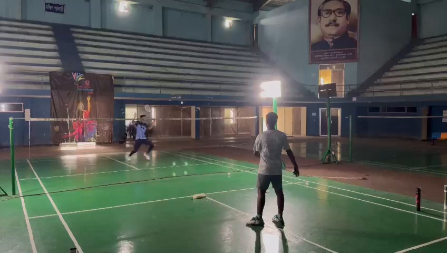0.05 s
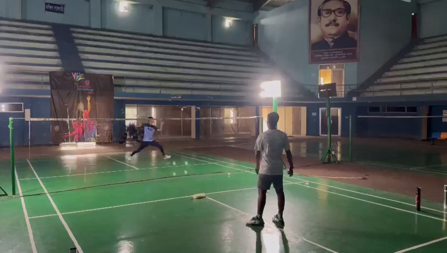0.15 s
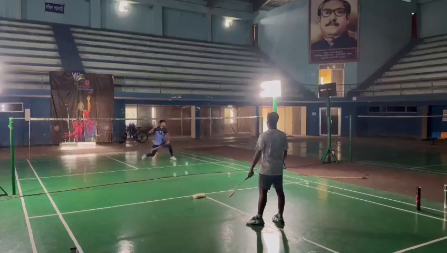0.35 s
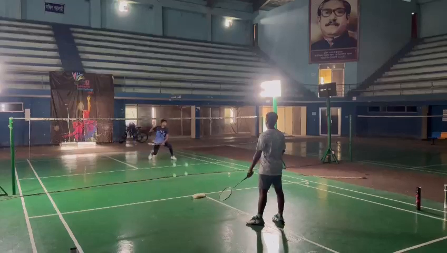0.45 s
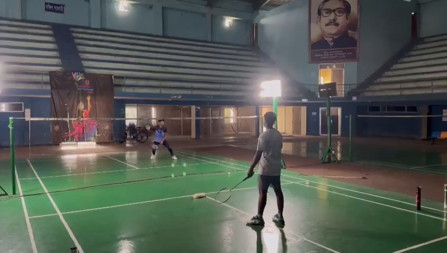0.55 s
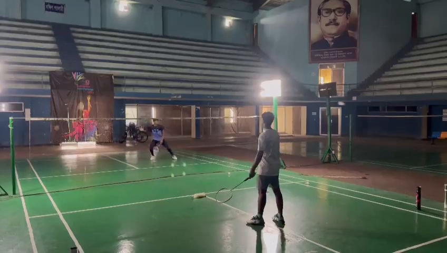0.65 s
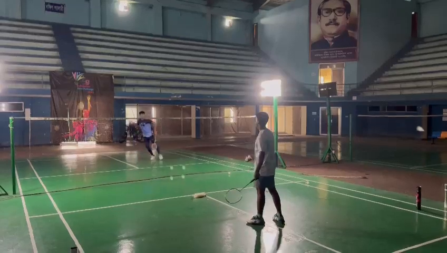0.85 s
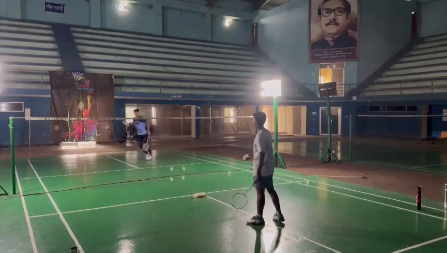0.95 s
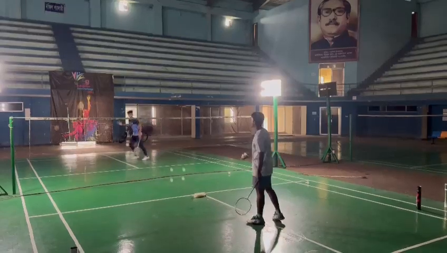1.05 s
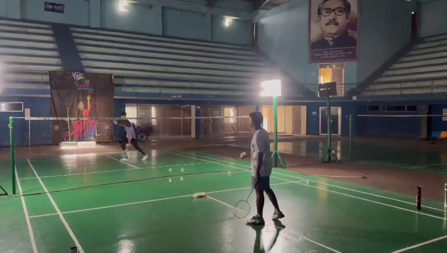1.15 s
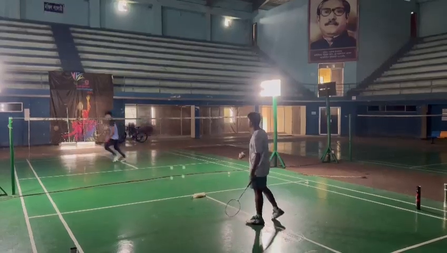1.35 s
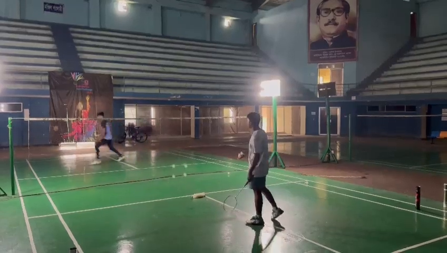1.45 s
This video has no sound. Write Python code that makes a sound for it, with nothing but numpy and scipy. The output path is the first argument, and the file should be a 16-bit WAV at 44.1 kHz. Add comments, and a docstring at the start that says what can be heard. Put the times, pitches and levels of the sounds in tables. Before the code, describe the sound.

In a large hard sports hall, faint high squeaks and a quick step lead to one loud, stringy racket pop, slightly left; its echo lingers over low rumble, and soft footfalls and a scuff come last.

```python
"""A large, hard sports hall: a racket strikes a shuttlecock as shoes squeak, thud and scuff on the court.
The blow is a gliding string tone, a sagging thump, frame modes and a noise crackle; squeaks are gliding
tones, footfalls damped knocks with slaps of noise, scuffs short high-passed noise.
A near surface answers within two hundredths of a second, then the long tail of the hall, noise
decaying band by band, swells in over a steady rumble of coloured noise."""
import sys
import numpy as np
from scipy import signal
from scipy.fft import rfft, irfft
from scipy.io import wavfile

SR = 44100
rng = np.random.default_rng(int(sys.argv[2]) if len(sys.argv) > 2 else 0)


def level_to_linear(level):
    """Convert decibel levels to linear amplitude factors, elementwise."""
    exponent = np.asarray(level, float) / 20
    return 10 ** exponent


def bounce(signal):
    """Save signal as a 16-bit WAV file at the path given by the first command-line argument."""
    frames = np.transpose(np.atleast_2d(signal))
    limited = np.clip(frames, -1, 1)
    pcm = np.round(limited * 32767).astype(np.int16)
    wavfile.write(sys.argv[1], SR, pcm)


N = 66150


def at_hz(rows, hz, column=1):
    """A table column read on a log-frequency axis."""
    rows = np.array(rows, float)
    return np.interp(np.log(hz + 1), np.log(rows[:, 0]), rows[:, column])


def since(s):
    """Seconds after s, zero before."""
    return np.maximum(np.arange(N) / SR - s, 0)


def pan(x, db):
    """Two channels, the left db above the right."""
    return x * level_to_linear(np.array([[db / 2], [-db / 2]]))


def ring(t, hz, t60):
    """A mode swings up with a time constant of one cycle and dies away exponentially."""
    rise = 1 - np.exp(-t * hz)
    return np.sin(2 * np.pi * hz * t) * rise * level_to_linear(-60 * t / t60)


def passed(x, hz, kind):
    """Second-order high- or low-pass."""
    return signal.sosfilt(signal.butter(2, hz, kind, fs=SR, output="sos"), x)


# Blows of the racket, a little left of the microphones.
# Each row: start in seconds, level in dB, left over right in dB.
BLOWS = [(0.3558, -10.5, 2.5)]
# Modes of frame and cork under each blow. Each row: pitch in Hz, relative level in dB, t60 in seconds.
FRAME_MODES = [(528, -14, 0.056), (1940, -1.5, 0.0048), (2720, -12.5, 0.0086)]


def racket():
    """The cork rings string bed and frame and pushes air; a bright crackle rides on the contact."""
    out = 0
    for start_s, db, pan_db in BLOWS:
        t = since(start_s)
        frame = sum(level_to_linear(mode_db) * ring(t, hz, t60) for hz, mode_db, t60 in FRAME_MODES)
        body = strings(t) + thump(t) + frame
        out = out + level_to_linear(db) * pan(body + crackle(t), pan_db)
    return out


STRINGS_HZ, LOADED_HZ = 1034, 790
CONTACT_S, LEAVE_S = 0.0028, 0.0022  # full contact, then the time to glide free
STRINGS_DB, DRIVEN_DB, STRINGS_T60_S = -6.5, 5, 0.072


def strings(t):
    """The cork's mass pulls the pitch down and drives it hard; as it leaves, the tone glides up and rings free."""
    loaded = 1 - np.clip((t - CONTACT_S) / LEAVE_S, 0, 1)
    hz = STRINGS_HZ + (LOADED_HZ - STRINGS_HZ) * loaded
    phase = 2 * np.pi * np.cumsum(hz * (t > 0)) / SR
    level = level_to_linear(STRINGS_DB + DRIVEN_DB * loaded - 60 * t / STRINGS_T60_S)
    return np.sin(phase) * np.minimum(t / 0.00078, 1) * level


# Low thump of the blow.
# Its row: start pitch in Hz, end pitch in Hz, sag time constant in seconds, relative level in dB, t60 in seconds.
THUMP = (400, 165, .009, -8, .075)


def thump(t):
    """A low push of air whose pitch sags as it dies."""
    start_hz, end_hz, sag_s, db, t60 = THUMP
    hz = end_hz + (start_hz - end_hz) * np.exp(-t / sag_s)
    phase = 2 * np.pi * np.cumsum(hz * (t > 0)) / SR
    return np.sin(phase) * (1 - np.exp(-t / 0.003)) * level_to_linear(db - 60 * t / t60)


# Colour of the contact crackle. Each row: frequency in Hz, relative level in dB per Hz.
CRACK_COLOUR = [(1500, 5), (3400, -9), (4300, -1.5), (5600, -6), (6500, -19.5), (8400, -1.5), (10400, -8),
                (12000, -13)]
CRACK_DB = -13
CRACK_SIDE_DB = 1  # difference between the microphones, against what they share
CRACK_RISE_S, CRACK_HOLD_S, CRACK_T60_S = 0.001, 0.0027, 0.011


def crackle(t):
    """A short burst of bright noise, partly different in each microphone."""
    hz = np.arange(N // 2 + 1) * SR / N
    spectra = rfft(rng.standard_normal((2, N))) * level_to_linear(at_hz(CRACK_COLOUR, hz))
    mid, side = irfft(spectra * (hz > 1200), N)
    noise = (mid + level_to_linear(CRACK_SIDE_DB) * side * [[1], [-1]]) / mid.std()
    fade = level_to_linear(-60 * np.maximum(t - CRACK_HOLD_S, 0) / CRACK_T60_S)
    return level_to_linear(CRACK_DB) * noise * np.minimum(t / CRACK_RISE_S, 1) * fade


# Shoe squeaks, well to the left of the microphones.
# Each row: start in seconds, length in seconds, level in dB, start pitch in Hz, end pitch in Hz,
# octave partial in dB against the fundamental.
SQUEAKS = [(.0880, 0.0072, -30.5, 4750, 4500, -24), (0.1196, 0.016, -35, 4520, 4415, -21),
           (0.1334, 0.0057, -35.5, 4450, 4140, -5), (0.4204, 0.0158, -29.5, 4800, 4207, -36)]
SQUEAK_PAN_DB = 9
SQUEAK_ROUGH, SQUEAK_WAVER_HZ = 0.1, 50  # rms depth of level and pitch unsteadiness


def squeaks():
    """Rubber sticks and slips: a brief gliding tone with its octave, slightly rough."""
    out = 0
    grit = passed(rng.standard_normal(N), 610, "low")
    grit = grit / grit.std()
    waver_hz = SQUEAK_WAVER_HZ * grit[::-1]  # reversed, so pitch and level do not move together
    for start_s, length_s, db, start_hz, end_hz, octave_db in SQUEAKS:
        u = np.minimum(since(start_s) / length_s, 1)
        hz = start_hz + (end_hz - start_hz) * u + waver_hz
        phase = 2 * np.pi * np.cumsum(hz) / SR
        tone = np.sin(phase) + level_to_linear(octave_db) * np.sin(2 * phase)
        out = out + level_to_linear(db) * np.sin(np.pi * u) ** 1.4 * tone * (1 + SQUEAK_ROUGH * grit)
    return pan(out, SQUEAK_PAN_DB)


# Footfalls on the court, a little left of the microphones.
# Each row: start in seconds, level in dB, pitch in Hz, t60 in seconds, slap in dB against the step.
STEPS = [(.3035, -22.5, 640, .016, -8), (.3092, -22.5, 470, .032, -10), (1.2845, -30, 1390, .018, -9),
         (1.3372, -28, 900, .014, -7)]
STEP_PAN_DB = 2
SLAP_HZ, SLAP_T60_S = 2400, 0.018
BOARD_HZ, BOARD_DB, BOARD_T60_S = 830, -6, 0.022  # a floorboard sounds under every footfall


def footfalls():
    """Each footfall is a damped knock of sole and board with a slap of noise."""
    out = 0
    slap = rng.standard_normal(N)
    slap = passed(passed(slap, SLAP_HZ, "low"), SLAP_HZ, "low")
    for start_s, db, hz, t60, slap_db in STEPS:
        t = since(start_s)
        shape = np.minimum(t / 0.00093, 1) * level_to_linear(-60 * t / SLAP_T60_S)
        burst = level_to_linear(slap_db) * slap / slap.std() * shape
        knock = ring(t, hz, t60) - level_to_linear(BOARD_DB) * ring(t, BOARD_HZ, BOARD_T60_S)
        out = out + pan(level_to_linear(db) * (knock + burst), STEP_PAN_DB)
    return out


# A sole scuffs the court briefly. Each row: start in seconds, length in seconds, noise level in dB before filtering.
SCUFFS = [(1.334, 0.0075, -45.5), (1.346, 0.015, -53)]


def scuffs():
    """Rubbing makes high-passed noise that swells and fades, independent in each microphone."""
    rub = 0
    for start_s, length_s, db in SCUFFS:
        rub = rub + level_to_linear(db) * np.sin(np.pi * np.minimum(since(start_s) / length_s, 1))
    return rub * passed(rng.standard_normal((2, N)), 3000, "high")


# Near surface on the other side of the microphones.
# Its row: level in dB, left over right in dB, high-pass in Hz, low-pass in Hz.
ECHO = (-5.5, -3.5, 1250, 8500)
ECHO_S = 0.0172


def near_echo(dry):
    """One delayed reflection from the other side, without bass and top."""
    db, pan_db, low_hz, high_hz = ECHO
    t = np.arange(N) / SR
    late = np.interp(t - ECHO_S, t, dry.mean(axis=0), left=0)
    late = passed(passed(late, low_hz, "high"), low_hz, "high")
    return pan(level_to_linear(db) * passed(late, high_hz, "low"), pan_db)


# Diffuse sound at the two microphones. Each row: frequency in Hz, left-right likeness from 0 to 1.
LIKENESS = [(60, 1), (170, 0.98), (500, 0.57), (1440, 0.013), (4150, 0.06), (12000, 0.56)]
# Balance of the diffuse sound. Each row: frequency in Hz, left over right in dB.
LEANING = [(60, 0.0), (170, -0.5), (500, 1), (1440, 0.5), (4150, 0.5), (12000, 0)]


def diffuse(colour):
    """Stereo noise spectra in the colour of a table, alike in the bass, leaning by band."""
    hz = np.arange(N // 2 + 1) * SR / N
    mid, side = rfft(rng.standard_normal((2, N)))
    alike = np.clip(at_hz(LIKENESS, hz), -1, 1)
    both = np.sqrt((1 + alike) / 2) * mid + np.sqrt((1 - alike) / 2) * side * [[1], [-1]]
    lean_db = at_hz(LEANING, hz) * [[0.5], [-0.5]]
    return hz, both * level_to_linear(at_hz(colour, hz) + lean_db)


# Tail of the hall, far around the microphones.
# Each row: band centre in Hz, relative level of a blow as it fills the hall in dB, t60 in seconds.
HALL = [(40, -15, 2.1), (88, 1, 1.78), (173, -5.5, 9.6), (350, 0, 3.13), (650, -4, 6.45), (1050, 1.5, 2.53),
        (1090, -6.5, 2.15), (1730, -8.5, 3.37), (3240, -13.5, 2.55), (4500, -13.5, 2.3),
        (7020, -17.5, 1.43), (8060, -15, 1.89), (10200, -25.5, 1.45)]
BLOW_WET_DB, SQUEAK_WET_DB, FEET_WET_DB = -8.5, -39.5, -39
FAR_WALL_S, SWELL_S = 0.0533, 0.0027
EARLY_BASS_DB, EARLY_TREBLE_DB = -4.5, -1.5  # before the far walls reply
FAR_WALL_DB, FAR_WALL_FADE_S = 3, 0.025  # their first answer stands out in the bass
PATCHY_DB, PATCHES_HZ = 1.5, 12.8  # reflections come in clumps


def hall(shoes):
    """Noise dying by band answers a click and swells when far walls reply; blows enter as coloured clicks."""
    hz, noise = diffuse([(20, 0), (20000, 0)])
    t = np.arange(N) / SR
    centres = [row[0] for row in HALL]
    arrived = np.clip((t - FAR_WALL_S) / SWELL_S, 0, 1)
    first_fade = np.exp(-np.maximum(t - FAR_WALL_S - SWELL_S, 0) / FAR_WALL_FADE_S)
    first_db = FAR_WALL_DB * arrived * first_fade
    plain, coloured = 0, 0
    for k, (centre, db, t60) in enumerate(HALL):
        share = np.interp(np.log(hz + 1), np.log(centres), np.arange(len(HALL)) == k)
        clumps = passed(rng.standard_normal(N), PATCHES_HZ, "low")
        early_db = EARLY_BASS_DB if centre < 2000 else EARLY_TREBLE_DB
        swell_db = early_db * (1 - arrived) + first_db * (centre < 2000)
        swell = level_to_linear(swell_db + PATCHY_DB * clumps / clumps.std()) * np.minimum(t / 0.0046, 1)
        band = irfft(noise * share, N) * level_to_linear(-60 * t / t60) * swell
        plain = plain + band
        coloured = coloured + level_to_linear(db) * band
    out = signal.fftconvolve(shoes.mean(axis=0)[None], plain, axes=1)[:, :N]
    for start_s, db, _ in BLOWS:
        start = int(start_s * SR)
        out[:, start:] += level_to_linear(db + BLOW_WET_DB) * coloured[:, :N - start]
    return out


# Air and distant play, as a steady floor. Each row: frequency in Hz, relative level in dB per Hz.
RUMBLE_COLOUR = [(25, -36), (45, 7), (80, 12), (180, 5.5), (450, 3.5), (930, 0), (1290, -6), (2500, -9),
                 (4500, -17), (6500, -18), (8900, -25), (11000, -28.5), (12500, -31)]
RUMBLE_DB, RUMBLE_FLICKER_DB = -47, 0.5  # rms level and rms flicker


def rumble():
    """Coloured noise makes the hall's steady floor, its level flickering a little."""
    noise = irfft(diffuse(RUMBLE_COLOUR)[1], N)
    slow = passed(rng.standard_normal(N), 2.67, "low")
    return level_to_linear(RUMBLE_DB + RUMBLE_FLICKER_DB * slow / slow.std()) * noise / noise.std()


def scene():
    """All sources with their echo and tail, over the rumble."""
    squeak = squeaks()
    foot = footfalls() + scuffs()
    dry = racket() + squeak + foot
    tail = hall(level_to_linear(SQUEAK_WET_DB) * squeak + level_to_linear(FEET_WET_DB) * foot)
    return dry + near_echo(dry) + tail + rumble()


def band_limit(x):
    """A steep low-pass at the top of the band."""
    return signal.sosfilt(signal.butter(12, 12570, fs=SR, output="sos"), x)


# Gap in the treble. Its row: centre in Hz, width in Hz, share of the filtered sound from 0 to 1.
TREBLE_GAP = (9680, 750, .97)


def record(dry):
    """A gap is filtered into the treble and both ends of the spectrum are cut steeply."""
    centre_hz, width_hz, depth = TREBLE_GAP
    edges_hz = [centre_hz - width_hz / 2, centre_hz + width_hz / 2]
    gap = signal.butter(3, edges_hz, "bandstop", fs=SR, output="sos")
    mix = (1 - depth) * dry + depth * signal.sosfilt(gap, dry)
    mix = passed(passed(mix, 17.4, "high"), 17.4, "high")
    top_cut = signal.cheby2(12, 50, 12320, fs=SR, output="sos")  # 50 dB down from 12320 Hz
    mix = signal.sosfilt(top_cut, mix)
    return band_limit(mix)


dry = scene()
out = record(dry)
bounce(out)
```